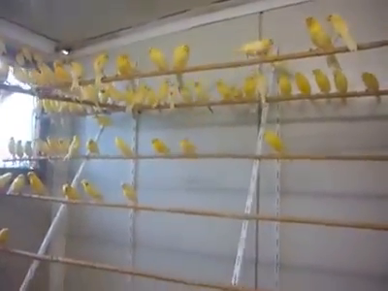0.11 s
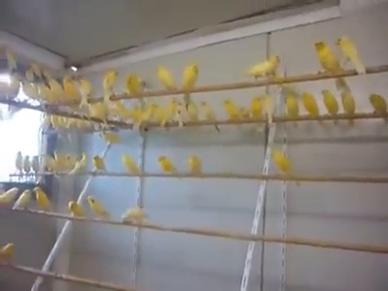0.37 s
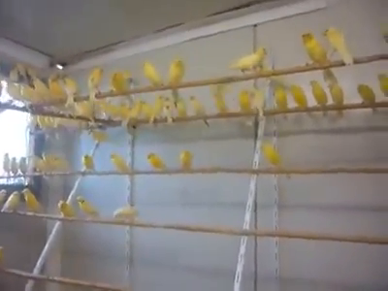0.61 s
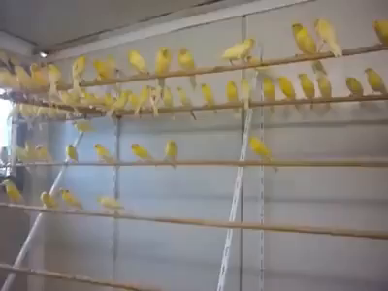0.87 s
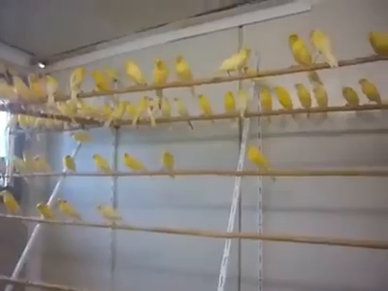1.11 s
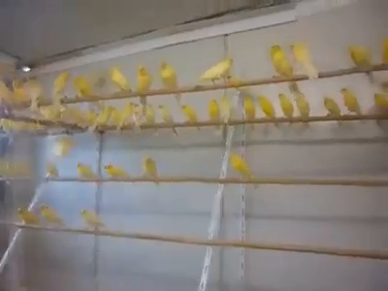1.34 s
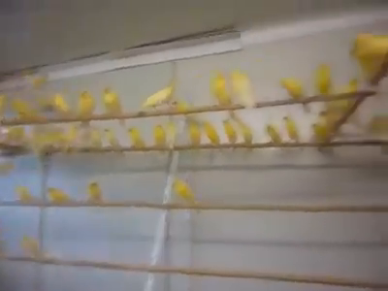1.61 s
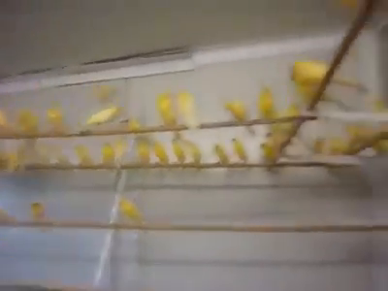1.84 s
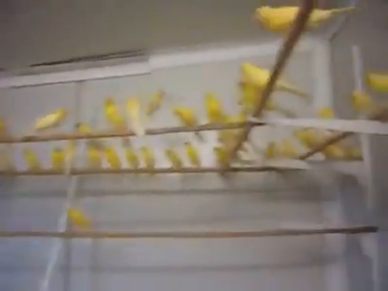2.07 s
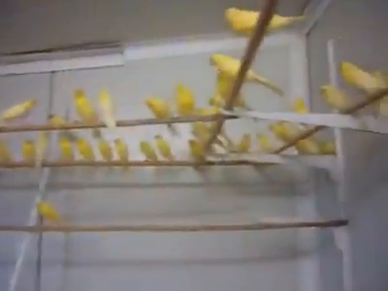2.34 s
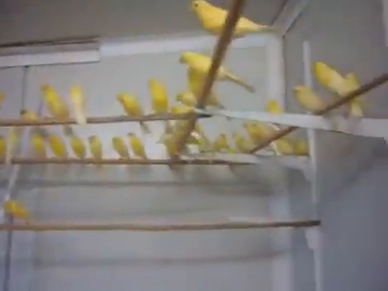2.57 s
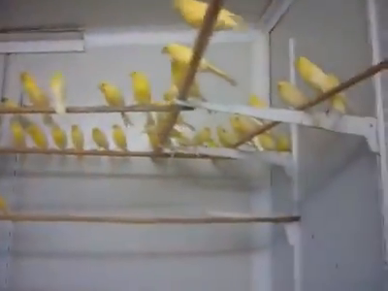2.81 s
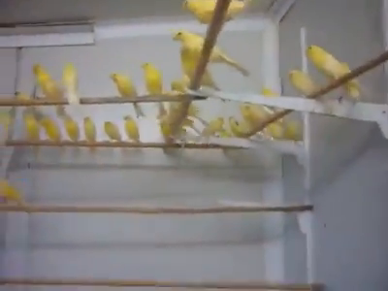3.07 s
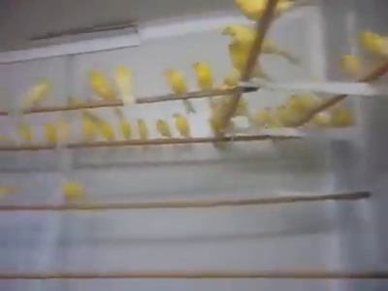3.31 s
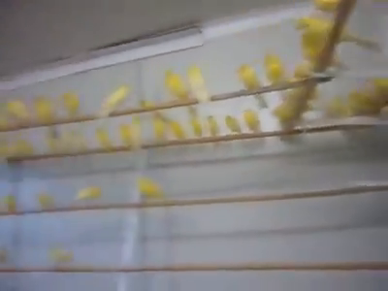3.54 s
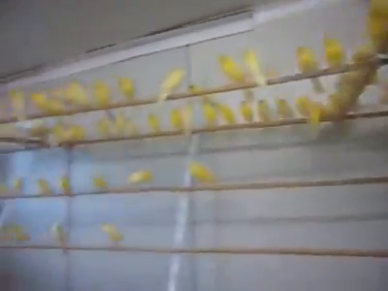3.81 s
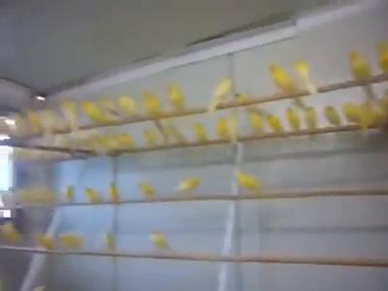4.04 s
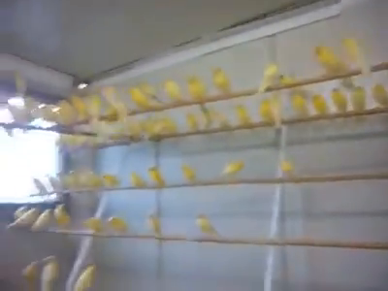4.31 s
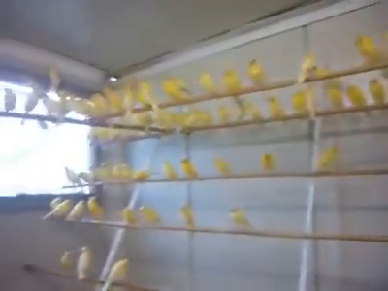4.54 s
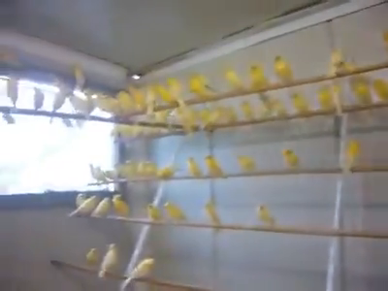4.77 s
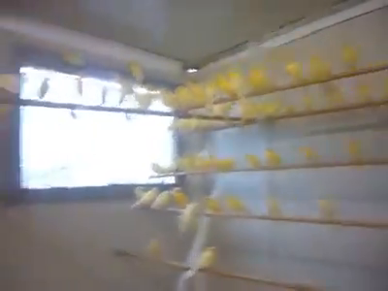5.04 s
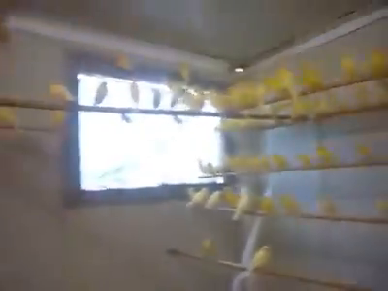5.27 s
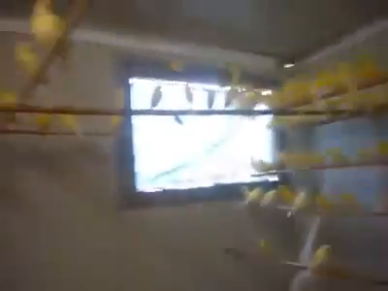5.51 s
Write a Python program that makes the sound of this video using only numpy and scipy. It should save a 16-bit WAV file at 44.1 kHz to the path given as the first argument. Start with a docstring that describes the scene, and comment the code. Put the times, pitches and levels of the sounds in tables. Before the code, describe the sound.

Wings flutter and rustle continuously with a low, uneven push of air. Over it, small birds call: sparse whistle and chirps at first, a wavering warble after two seconds, buzzy notes at three, then busy chirping, another long whistle and husky squawks at the end. Close, short room echo; the microphone is modest, with limited treble.

```python
"""Canaries whistle, chirp and squawk over the flutter and rustle of wings in a small hard-walled aviary room.
Voices are near-sine notes, many with an octave overtone, spread by noise where raspy; beak hiss is filtered noise.
Faint high tones sound along with the notes. Single wing beats are puffs of band noise; the flock is
throbbing air push and feather rustle. Feedback delays make the room, low resonances its boom.
The top is cut steeply near 8.9 kHz and the signal sits on a steady offset."""
import sys
import numpy as np
from scipy import signal
from scipy.fft import rfft, irfft, next_fast_len
from scipy.io import wavfile

SR = 44100
rng = np.random.default_rng(int(sys.argv[2]) if len(sys.argv) > 2 else 0)


def magnitude_from_level(level_db):
    """Linear magnitude for a level in decibels (20 dB per decade)."""
    exponent = np.asarray(level_db, float) / 20
    return 10 ** exponent


def put_to_file(sound):
    """Save the sound as 16-bit audio at rate SR, in the file named by the first command-line argument."""
    columns = np.atleast_2d(sound).T  # one column per channel
    safe = np.clip(columns, -1, 1)
    whole_steps = np.round(safe * 32767)
    wavfile.write(sys.argv[1], SR, whole_steps.astype(np.int16))


N = 248724


def rms_one(x):
    """Scale to rms 1."""
    return x / np.sqrt(np.mean(x ** 2) + 1e-20)


def drift(rate_hz):
    """Random motion of rms 1: noise through a double one-pole low-pass, run in."""
    run_in = 9000
    r = np.exp(-2 * np.pi * rate_hz / SR)
    noise = rng.standard_normal(N + run_in)
    return rms_one(signal.lfilter([1], [1, -2 * r, r * r], noise)[run_in:])


def band_pass(x, low_hz, high_hz):
    """Butterworth band-pass of design order 2."""
    return signal.sosfilt(signal.butter(2, [low_hz, high_hz], "band", fs=SR, output="sos"), x)


def coloured(spectrum, patchy_db, grain_db):
    """Third-octave noise bands, each with its own level and flicker; grain makes them crackle; rms 1."""
    hz, db = np.transpose(spectrum)
    grainy = rng.standard_normal((2, N)) * magnitude_from_level(grain_db * drift(170))
    edges_hz = hz[0] * 2 ** np.arange(0, np.log2(hz[-1] / hz[0]) + .01, 1 / 3)
    out = 0
    for k, (low, high) in enumerate(zip(edges_hz, edges_hz[1:])):
        band = band_pass(grainy[k % 2], low, high)
        level_db = np.interp(np.log(low * high) / 2, np.log(hz), db)
        out = out + band * magnitude_from_level(level_db + patchy_db * drift(6.55))
    return rms_one(out)


def birds(waver_hz, tremble_db, rasp_db, edge_s):
    """The syrinx sings a sine and its octave; roughness makes it waver, tremble and rasp."""
    waver, tremble, octave_noise = drift(60), drift(70), drift(190)
    rasp = drift(250) + .35 * drift(900)
    hiss = beak_hiss()
    out = np.zeros(N)
    for s, pitch_hz, low_db, octave_db, rough in notes_and_overtones():
        span = np.arange(int((s[0] - edge_s) * SR), int((s[-1] + edge_s) * SR))
        t = span / SR
        fade = np.clip(np.minimum(t - t[0], t[-1] - t) / edge_s, 0, 1) ** 2
        hz = np.interp(t, s, pitch_hz) + rough * waver_hz * waver[span]
        phase = 2 * np.pi * (np.cumsum(hz) / SR + rng.random())
        low = magnitude_from_level(np.interp(t, s, low_db))
        high = magnitude_from_level(np.interp(t, s, octave_db))

        pure = 2 * hz < 4250  # octaves above this are mixed with noise
        octave_gain = np.where(pure, 1, 0.89 + 1.9 * octave_noise[span])
        tone = low * np.sin(phase) + high * octave_gain * np.sin(2 * phase)
        tone += inharmonic_tone(t, phase, low, pure * high)

        # roughness spreads noise around each partial
        steady = np.sqrt(max(1 - rough ** 2, 0)) * magnitude_from_level(rough * tremble_db * tremble[span])
        noisy = rough ** 2 * magnitude_from_level(rasp_db) * rasp[span]
        voice = (steady + noisy) * tone + rough * low * hiss[span]
        out[span] += np.sqrt(2) * fade * voice
    return out


def notes_and_overtones():
    """Each as times in s, pitch in Hz, nominal fundamental and octave dB, and roughness from 0 to 1."""
    # Two long two-toned whistles that shift strength between the tones.
    # Each row: time in s, pitch in Hz, fundamental in dB, octave in dB.
    whistle_tracks = [
        [(.047, 1415, -50, -38), (.067, 1652, -47, -35.5), (.081, 1770, -37.5, -31.5), (.109, 1800, -33, -30),
         (.123, 1857, -48, -37), (.137, 1810, -47, -27), (.16, 1870, -43, -32), (.203, 1867, -34.5, -35.5),
         (.235, 1870, -34, -43), (.262, 1860, -43, -31), (.282, 1834, -44, -42)],
        [(4.55, 1502, -69, -44), (4.575, 1798, -39.5, -31.5), (4.597, 1837, -32.5, -22.5),
         (4.613, 1860, -35, -46), (4.695, 1860, -41, -35.5), (4.749, 1864, -32.5, -51), (4.797, 1864, -32, -41),
         (4.808, 1863, -41, -40.5), (4.84, 1850, -29.5, -36), (4.87, 1870, -44.5, -47),
         (4.935, 1790, -41.5, -53)],
    ]
    # Two clear warbles of wandering pitch, two long buzzy calls. Each row: time in s, pitch in Hz, level in dB.
    warble_tracks = [
        [(2.132, 3000, -33), (2.146, 2700, -31), (2.165, 2520, -71), (2.185, 2700, -27.5), (2.21, 3100, -33.5),
         (2.235, 3480, -48), (2.265, 3140, -32), (2.285, 2876, -30.5), (2.312, 2807, -35.5),
         (2.37, 3090, -36.5), (2.39, 2990, -49), (2.422, 2897, -32.5), (2.449, 2700, -51)],
        [(3.2, 3196, -35), (3.218, 3035, -35.5), (3.268, 3190, -31), (3.327, 3314, -33.5), (3.352, 3330, -45),
         (3.365, 3630, -40.5), (3.4, 3740, -36.5), (3.485, 3765, -40), (3.525, 3845, -43)],
    ]
    buzz_tracks = [
        [(2.99, 3280, -32), (3.008, 2607, -25), (3.032, 2532, -28.5), (3.056, 2397, -32), (3.074, 2350, -29),
         (3.11, 2413, -34.5), (3.114, 2290, -36), (3.134, 2267, -28), (3.138, 2220, -32.5), (3.16, 2320, -48)],
        [(4.3, 2955, -36.5), (4.324, 2697, -26.5), (4.348, 2738, -49), (4.372, 2840, -25.5), (4.382, 2812, -35),
         (4.398, 2797, -28), (4.408, 2789, -35.5), (4.442, 2772, -24), (4.482, 2687, -32.5), (4.515, 2700, -37)],
    ]
    # Smooth chirps; raspy chirps; husky squawks and noisy overtones of other calls;
    # faint steady high tones sounding along with some calls.
    # Each row: start in s, length in s, first pitch in Hz, last pitch in Hz, peak level in dB.
    chirp_rows = [(0.273, 0.03, 2856, 2820, -35), (0.321, 0.032, 2860, 2780, -45),
                  (1.325, 0.081, 2690, 3080, -39.5), (1.328, 0.079, 3400, 3780, -43),
                  (1.85, 0.079, 3655, 3580, -37), (1.855, 0.051, 2615, 2830, -31),
                  (1.957, 0.038, 2450, 2700, -30), (1.959, 0.025, 3200, 3260, -36),
                  (2.248, 0.043, 2250, 2376, -28), (2.583, 0.053, 2810, 2955, -41.5),
                  (3.596, 0.034, 2730, 2950, -41.5), (3.569, 0.013, 2196, 2360, -27),
                  (3.592, 0.035, 2310, 2390, -36), (3.631, 0.017, 2284, 2375, -28),
                  (3.671, 0.04, 2334, 2380, -36.5), (3.677, 0.045, 2990, 3100, -41.5),
                  (4.411, 0.12, 3614, 3540, -36), (4.576, 0.047, 908, 870, -41)]
    rasp_rows = [(0.188, 0.1, 3060, 2790, -39), (1.494, 0.1, 1522, 1390, -42.5),
                 (3.503, 0.037, 1530, 1980, -41), (3.711, 0.028, 2140, 2295, -33),
                 (4.276, 0.048, 1855, 2600, -36), (4.331, 0.025, 2900, 3340, -32),
                 (4.346, 0.02, 3340, 2820, -28), (4.431, 0.085, 3110, 2550, -40),
                 (5.145, 0.028, 1695, 1960, -45), (5.154, 0.026, 1932, 2145, -27.5),
                 (5.182, 0.032, 2210, 2340, -31), (5.171, 0.06, 2800, 3190, -38),
                 (5.266, 0.057, 3000, 3220, -38), (5.259, 0.067, 2345, 2550, -32),
                 (5.493, 0.033, 2170, 3106, -32)]
    noisy_rows = [(0.258, 0.05, 3796, 3254, -33), (0.261, 0.056, 4720, 4580, -48),
                  (0.283, 0.044, 1916, 1732, -43), (2.256, 0.069, 4530, 4700, -38),
                  (2.994, 0.0416, 3400, 3020, -32), (2.997, 0.079, 5590, 4900, -48),
                  (3.493, 0.065, 3300, 3250, -44), (3.555, 0.04, 1552, 2100, -36),
                  (3.614, 0.035, 1570, 2020, -40.5), (3.679, 0.08, 4720, 5220, -46.5),
                  (3.847, 0.076, 4170, 2844, -44.5), (3.845, 0.047, 3250, 2810, -44),
                  (4.421, 0.074, 5700, 5360, -39.5), (4.448, .07, 4600, 4800, -45),
                  (4.538, 0.039, 5200, 5670, -42.5), (4.873, 0.025, 3016, 3085, -38.5),
                  (5.14, 0.046, 5760, 6300, -48), (5.144, 0.067, 3680, 4580, -42),
                  (5.179, 0.041, 5590, 5300, -37.5), (5.226, 0.062, 4630, 4830, -41.5),
                  (5.237, 0.0387, 1293, 2270, -33), (5.249, 0.045, 3400, 3890, -40),
                  (5.517, 0.044, 3650, 3700, -46), (5.52, 0.066, 2810, 2970, -43.5)]
    faint_rows = [(1.86, 0.064, 6375, 6374, -40), (1.952, 0.048, 6360, 6374, -41.5),
                  (3.684, 0.028, 7070, 7200, -47), (4.3, 0.055, 5296, 5300, -40)]
    # Contours: peak and end of hold as shares of length, swell in dB, sink in dB, glide as a share of length.
    smooth_shape = (0.1, 0.52, 3.3, 9, 0.27)
    raspy_shape = (0.065, 0.46, 2.6, 12, 0.6)

    # shapes, octave dB relative to the fundamental, roughness
    kinds = [
        ([np.transpose(rows) for rows in warble_tracks], -48.5, 0.035),
        ([np.transpose(rows) for rows in buzz_tracks], -20, 0.5),
        ([chirp(*row, smooth_shape) for row in chirp_rows], -31, 0.42),
        ([chirp(*row, raspy_shape) for row in rasp_rows], -26.5, 0.68),
        ([chirp(*row, raspy_shape) for row in noisy_rows], -60, 0.92),
        ([chirp(*row, smooth_shape) for row in faint_rows], -60, 0),
    ]
    notes = [(*np.transpose(rows), 0.17) for rows in whistle_tracks]
    for shapes, octave_db, rough in kinds:
        notes += [(s, pitch_hz, db, db + octave_db, rough) for s, pitch_hz, db in shapes]
    return notes


def chirp(start_s, length_s, first_hz, last_hz, peak_db, shape):
    """Times, pitch and level of one chirp: exponential glide, linear dB swell, hold and sink."""
    peak, hold, swell_db, sink_db, glide = shape
    share = np.linspace(0, 1, num=32)
    pitch_hz = last_hz + (first_hz - last_hz) * np.exp(-share / glide)
    db = peak_db - np.interp(share, [0, peak, max(hold, peak), 1], [swell_db, 0, 0, sink_db])
    return start_s + length_s * share, pitch_hz, db


def inharmonic_tone(t, phase, low, pure_octave):
    """A faint inharmonic high tone 4134 Hz above each note, and a fainter one above its pure octave."""
    turn = 2 * np.pi * 4134 * t
    octave = magnitude_from_level(-19) * pure_octave * np.sin(2 * phase + turn)
    return magnitude_from_level(-22.5) * (low * np.sin(phase + turn) + octave)


def beak_hiss():
    """Air hissing through the beak: band noise, scaled later by each note's level and roughness."""
    return magnitude_from_level(-22.5) * rms_one(band_pass(rng.standard_normal(N), 4200, 8800))


def wing_beats(rise_s):
    """Single beats and take-offs: broad noise puffs that rise fast and decay exponentially."""
    # Each row: start in s, nominal peak level in dB, centre in Hz, t60 in s.
    beat_rows = [(.448, -33.5, 1420, 0.32), (0.573, -44.5, 6000, 0.34), (0.619, -43, 4230, 0.93),
                 (1.05, -40, 210, 0.17), (1.053, -42.5, 2600, 0.39), (1.27, -42.5, 4950, 0.098),
                 (1.327, -41.5, 4240, 0.5), (1.545, -34.5, 395, 0.5), (1.615, -33, 515, 0.16),
                 (1.74, -39.5, 3000, 0.2), (2.093, -28.5, 5500, 0.068), (2.096, -43, 70, 0.31),
                 (2.656, -25.5, 2470, 0.037), (2.955, -35, 2330, 0.35), (3.397, -28.5, 6460, 0.048),
                 (4.092, -37.5, 2370, 0.23), (4.133, -42.5, 6000, 0.31), (5.102, -37, 2340, 0.25),
                 (5.151, -36, 5000, 0.47), (5.47, -29.5, 202, 0.081)]
    out = np.zeros(N)
    t = np.arange(SR // 2) / SR
    for s, peak_db, hz, t60_s in beat_rows:
        low_hz, high_hz = np.clip([hz / 2.5, hz * 1.82], 50, 12000)
        puff = rms_one(band_pass(rng.standard_normal(len(t)), low_hz, high_hz))
        envelope = (1 - np.exp(-t / rise_s)) * magnitude_from_level(peak_db - 60 * t / max(t60_s, .02))
        first = int(s * SR)
        out[first:][:len(t)] += (puff * envelope)[:N - first]
    return out


def flock(flap_hz, flap_db):
    """Many wings: a low air push and a feather rustle, both throbbing at an uneven flap rate."""
    # Each row: time in s, air push in dB, feather rustle in dB.
    wing_levels = [(0, -41.5, -43.5), (.9, -42.5, -47.5), (1.45, -43.5, -46), (1.62, -40.5, -39),
                   (1.85, -40, -41.5), (2.15, -35.5, -39.5), (2.3, -39, -44), (2.67, -33, -35.5),
                   (2.9, -36, -42.5), (3.502, -42.5, -46), (3.85, -43.5, -46), (4.15, -39.5, -43.5),
                   (4.63, -42, -39.5), (5.05, -38.5, -44.5), (5.64, -36.5, -42.5)]
    # Noise spectra. Each row: frequency in Hz, relative density in dB per Hz.
    push_spectrum = [(28, -8), (65, -41), (100, -7.5), (300, -9.5), (700, -11), (2500, -33), (3300, -51.5)]
    rustle_spectrum = [(530, -15.5), (900, 0.5), (3500, -7), (4660, -11), (6660, -16), (8500, -14),
                       (11000, -35)]
    s, push_db, rustle_db = np.transpose(wing_levels)
    t = np.arange(N) / SR
    rate_hz = flap_hz * (1 + 0.46 * drift(3.35))
    throb_db = flap_db * np.sin(2 * np.pi * np.cumsum(rate_hz) / SR)
    push = boom(coloured(push_spectrum, patchy_db=2.0, grain_db=1.0))
    rustle = coloured(rustle_spectrum, patchy_db=2.5, grain_db=1.2)
    push = magnitude_from_level(np.interp(t, s, push_db) + throb_db) * push
    return push + magnitude_from_level(np.interp(t, s, rustle_db) + throb_db) * rustle


def boom(x):
    """Low room resonances lift narrow bands of the air push; rms 1."""
    # Each row: frequency in Hz, width in Hz, lift in dB.
    resonances = [(144, 6.5, 8.5), (199, 67, 4), (292.5, 30, 9), (380.8, 14.3, 11), (448, 11, 7.5),
                  (610.5, 8.1, 8)]
    out = x
    for hz, width_hz, db in resonances:
        r = np.exp(-np.pi * width_hz / SR)
        poles = [1, -2 * r * np.cos(2 * np.pi * hz / SR), r * r]
        peak = signal.lfilter([1, 0, -1], poles, x) * (1 - r * r) / 2
        out = out + (magnitude_from_level(db) - 1) * peak
    return rms_one(out)


def room(x):
    """Sixteen feedback delays between the walls, duller on every round."""
    low_t60_s, wall_cut_hz = .22, 3600
    size = next_fast_len(N + SR)
    delay_one = np.exp(-2j * np.pi * np.arange(size // 2 + 1) / size)  # one-sample delay
    dull = np.exp(-2 * np.pi * wall_cut_hz / SR)
    wall = (1 - dull) / (1 - dull * delay_one)
    walls = 0
    lags = (rng.uniform(.004, .03, size=16) * SR).astype(int)
    for k, lag in enumerate(lags):
        loop = magnitude_from_level(-60 * lag / SR / low_t60_s) * wall * delay_one ** lag
        walls = walls + (-1) ** k * loop / (1 - loop)
    return irfft(rfft(x, size) * walls, size)[:N]


def scene():
    """Birds and single beats with their room sound, over the flock."""
    near = birds(waver_hz=71.6, tremble_db=4.0, rasp_db=0.0, edge_s=.0045)
    near = near + wing_beats(rise_s=0.00075)
    wings = flock(flap_hz=21.07, flap_db=0.86)
    return (near + magnitude_from_level(-13.5) * room(near) + wings)[None]


def roll_off(x):
    """The treble ends steeply here."""
    return signal.sosfilt(signal.butter(12, 8930, fs=SR, output="sos"), x)


def record(dry):
    """A steep top cut near 8.9 kHz, and a steady offset."""
    cutoff_hz, offset = 8900, -.048
    cut = signal.sosfilt(signal.cheby2(12, 60, cutoff_hz, fs=SR, output="sos"), dry)
    return roll_off(cut + offset)


dry = scene()
out = record(dry)
put_to_file(out)
```